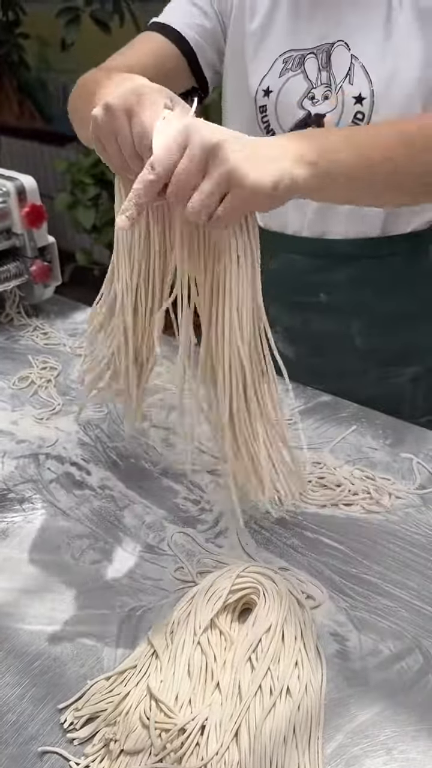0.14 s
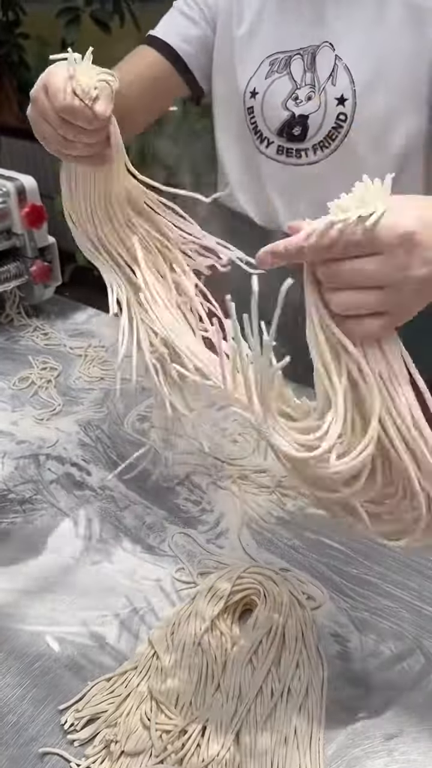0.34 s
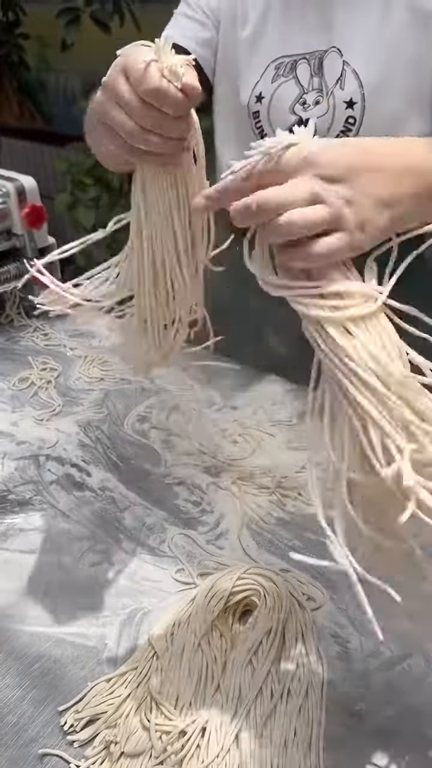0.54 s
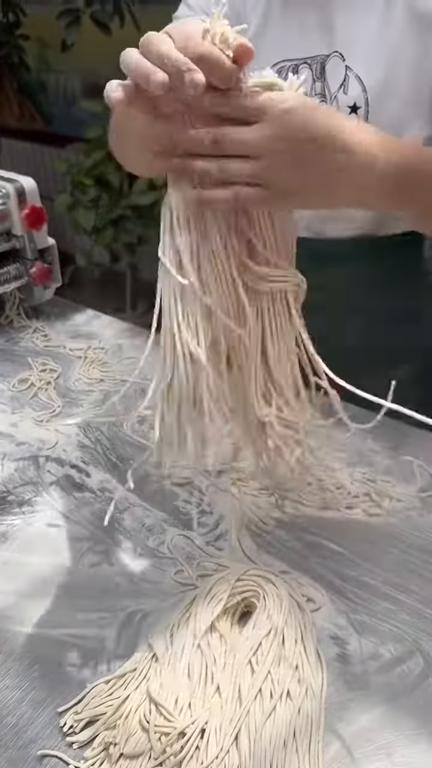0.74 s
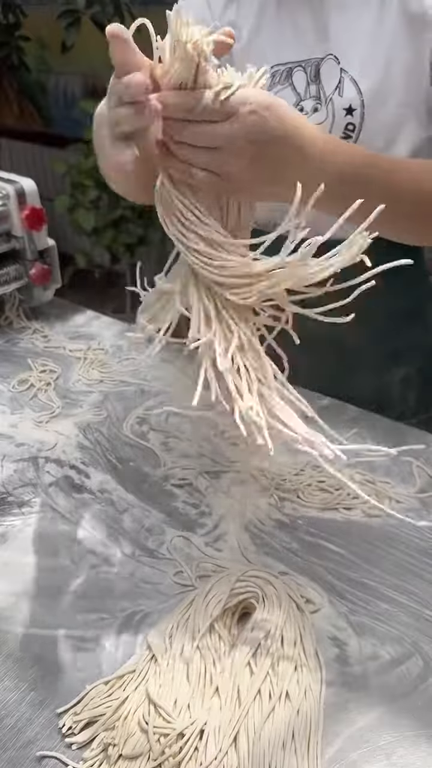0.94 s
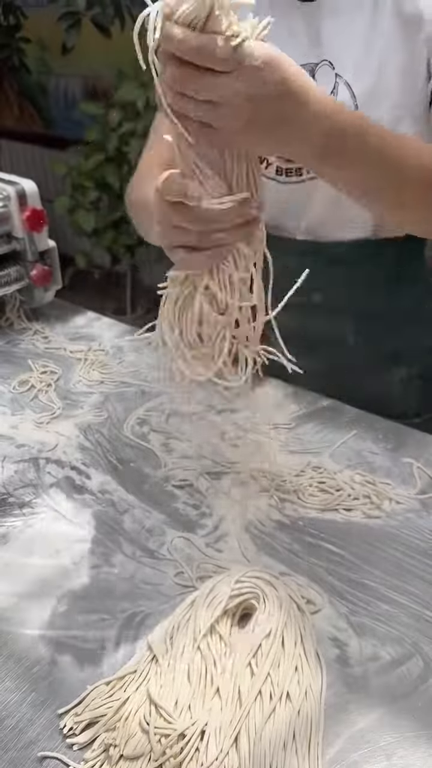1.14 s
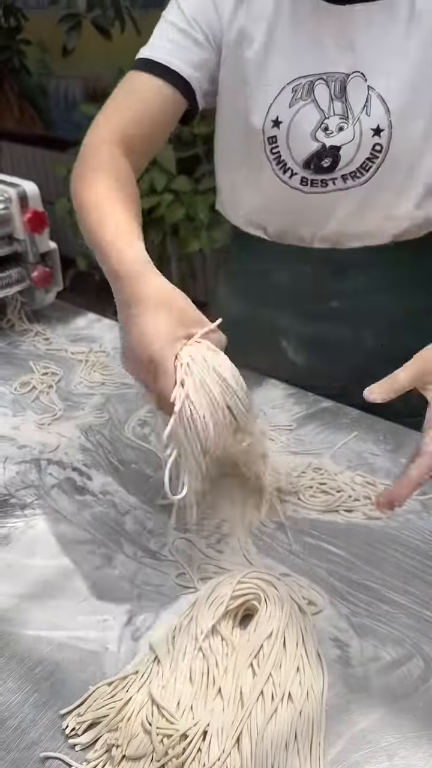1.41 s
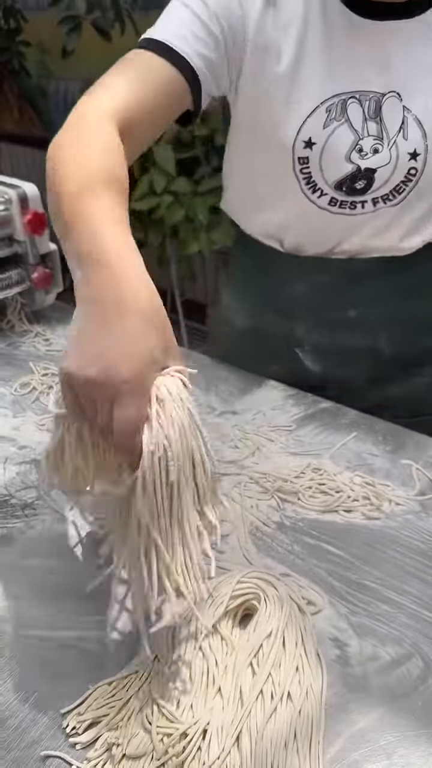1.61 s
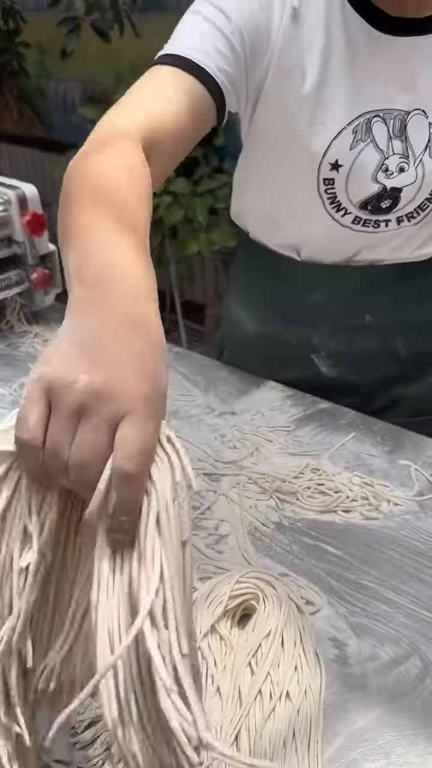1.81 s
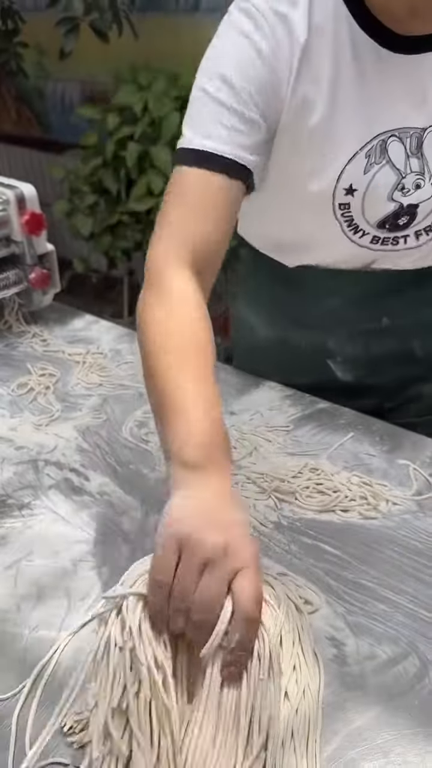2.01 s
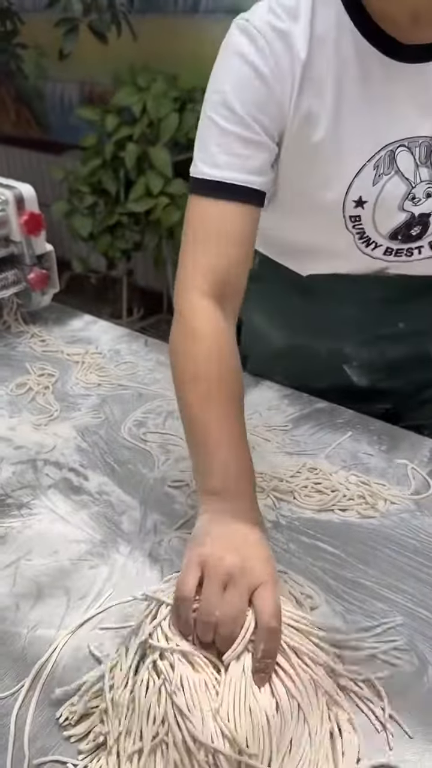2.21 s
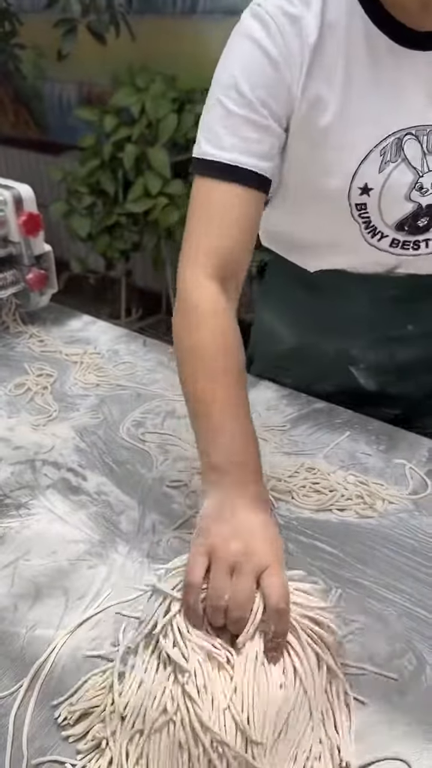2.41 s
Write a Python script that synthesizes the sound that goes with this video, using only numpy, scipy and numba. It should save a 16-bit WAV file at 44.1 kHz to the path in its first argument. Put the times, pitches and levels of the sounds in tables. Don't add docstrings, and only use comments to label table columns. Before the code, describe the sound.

A heavy slap of fresh noodles booms on a hollow metal worktop, then lighter pats follow

```python
import sys
import numpy as np
from scipy import signal
from scipy.fft import rfft, irfft
from scipy.io import wavfile
from numba import njit

SR = 44100
rng = np.random.default_rng(int(sys.argv[2]) if len(sys.argv) > 2 else 0)


def generate_wav(signal):
    frames = np.transpose(np.atleast_2d(signal))
    scaled = np.clip(frames, -1, 1) * 32767
    pcm = np.round(scaled).astype(np.int16)
    wavfile.write(sys.argv[1], SR, pcm)


def volts(x):
    e = np.asarray(x, float) / 20
    return 10 ** e


N = 114660
T = np.arange(N) / SR


def unit(x):
    return x / np.sqrt(np.mean(x ** 2))


@njit
def svf(x, hz, width):
    y, band_state, low_state = np.empty(len(x)), 0., 0.
    for i in range(len(x)):
        g, k = np.tan(np.pi * hz[i] / SR), width / hz[i]
        v = (band_state + g * (x[i] - low_state)) / (1 + g * (g + k))
        band_state = 2 * v - band_state
        low_state = low_state + 2 * g * v
        y[i] = k * v
    return y


def band(x, hz, width):
    return svf(x, hz + 0. * T, 1. * width) * np.sqrt(SR / (np.pi * width))


def twice(x, hz, width):
    return band(band(x, hz, width), hz, width) * np.sqrt(2 * np.pi * width / SR)


def high_pass(hz):
    return signal.butter(2, hz, "high", fs=SR, output="sos")


def dull(x):
    return signal.sosfilt(signal.cheby2(4, 22, DULL_HZ * 1.133, fs=SR, output="sos"), x)


def swell(at, rise, fade, hold=0):
    d = T - at
    rising = np.exp(-np.minimum((d / rise) ** 2, 99))
    fading = np.exp(-np.maximum(d - hold, 0) / fade)
    return np.where(d < 0, rising, fading)


def push(at, length):
    return np.cos(np.pi * np.clip((T - at) / length, -.5, .5)) ** 2


def grains(per_s, spread_db):
    hit, size, sign = rng.random((3, N))
    level = volts(np.minimum(-spread_db * np.log(size + 1e-9), 10))
    return unit((hit < per_s / SR) * level * np.sign(sign - .5))


DULL_HZ = 5300

# start in seconds, level in dB, length in seconds,
# direction.
AIR_PUSHES = [
    (.212, -11, .01, -1),
    (.2198, -3.7, .0115, 1),
    (.2293, -.5, .0058, -1),
    (.2495, -12, .003, -1),
    (.266, -14, .005, 1),
]
# pitch in Hz, level in dB, t60 in seconds.
BOOM_MODES = [(44.62, 0, 0.087), (87.74, -10, 0.056), (130, -7.5, 0.063), (191, -23, .05),
              (248.1, -23, .08), (314, -25.5, 0.061), (432.5, -16.5, .07)]


def slap_boom():
    force = sum(way * volts(db) * push(s + length / 2, length) for s, db, length, way in AIR_PUSHES)
    boom = 0
    for hz, db, t60 in BOOM_MODES:
        pole = np.exp(2j * np.pi * hz / SR - np.log(1000) / (t60 * SR))
        ring = signal.lfilter([1], [1, -pole], force).imag
        boom = boom + volts(db) * 2 * np.pi * hz / SR * ring
    return volts(1.77) * boom


# peak in seconds, level in dB, extra brightness in dB.
CRACK_ROWS = [
    (.2134, 0, 7),
    (.217, -5, 3),
    (.238, 0, -1),
    (.251, -6, -9),
    (.257, -7, -8),
]
# centre in Hz, width in Hz, level in dB.
CRACK_BANDS = [(550, 600, 4), (1200, 1200, -5), (2300, 1800, -12), (3800, 2200, -19), (6000, 2000, -30),
               (8300, 1500, -29)]


def slap_crack():
    noise = rng.standard_normal(N)
    bursts = [(db, up, swell(s, .0006, .0026)) for s, db, up in CRACK_ROWS]
    low = noise * sum(volts(db) * burst for db, up, burst in bursts)
    high = noise * sum(volts(db + up) * burst for db, up, burst in bursts)
    bands = [volts(db) * twice(high if hz > 900 else low, hz, width) for hz, width, db in CRACK_BANDS]
    return volts(-26.5) * sum(bands)


# centre in seconds, level in dB, length in seconds.
GUST_ROWS = [(0.045, -31.5, 0.011), (0.068, -31, 0.013), (0.088, -37.5, 0.013), (0.109, -39.5, 0.0086),
             (0.193, -21.5, 0.0075), (0.332, -47.5, 0.012), (0.393, -48, 0.0051), (0.415, -60, 0.0064),
             (1.266, -39.5, 0.012), (1.304, -38, 0.025), (1.347, -38, 0.0055), (1.368, -43.5, 0.0107),
             (1.395, -41, 0.0047), (2.082, -54.5, .008), (2.093, -54.5, 0.0081), (2.137, -43.5, 0.004)]


def gusts():
    air = -sum(volts(db) * push(s, length) for s, db, length in GUST_ROWS)
    return 2 * svf(air, 30 + 0. * T, 19.)


# pitch in Hz, width in Hz, level in dB.
RIM_RINGS = [(2646, 900, -2), (3280, 900, -14), (4630, 700, -14)]


def shoulder_and_rim(low, high, hollow):
    shoulder_level = volts(np.where(T < 1, -24, -8.5))
    shoulder = shoulder_level * twice(low, hollow * 1.32, 560)
    return shoulder + sum(volts(db) * twice(high, hz, width) for hz, width, db in RIM_RINGS)


HOLLOW_WIDTH_HZ = 270

# start in seconds, level in dB, fade in seconds,
# pitch of the hollow in Hz, brightness in dB.
PAT_ROWS = [(0.027, -37.5, 0.0045, 1060, -18), (.04, -45, 0.004, 964.1, -5.5),
            (1.337, -45, 0.0026, 956, -8), (1.34, -29, 0.0022, 950, -18.5),
            (1.367, -33.5, .0025, 935, -11.5), (1.373, -35, 0.0039, 942, -13),
            (1.381, -40, 0.0048, 942, -11), (1.397, -40.5, 0.002, 920, -12),
            (1.412, -44, 0.0022, 960, -9.5), (1.416, -39, .003, 960, -8), (1.426, -37.5, 0.0033, 990, -9.5),
            (1.433, -42, .002, 1000, -13), (1.438, -40.5, 0.0024, 1000, -11.5),
            (1.457, -47, 0.0027, 980, -5), (2.071, -30, 0.0023, 900, -13),
            (2.075, -28.5, 0.0017, 900, -14.5), (2.08, -38, 0.0018, 900, -10),
            (2.085, -28, 0.0023, 935, -21), (2.092, -17, 0.003, 913, -13), (2.1, -24.5, 0.0014, 948, -18),
            (2.11, -38.5, 0.004, 880, -14), (2.122, -44, 0.0023, 900, 2), (2.127, -42, 0.0035, 854, 4.5),
            (2.165, -50, 0.0038, 880, -2)]


def hollow_pitch():
    rows = np.array(PAT_ROWS)
    latest = np.searchsorted(rows[:, 0], T + .002) - 1
    return rows[np.clip(latest, 0, None), 3]


def pats(hollow):
    pops, low, high = 0, 0, 0
    for s, db, fade, hz, up in PAT_ROWS:
        rise = .55 * fade
        burst = swell(s + rise, rise, fade)
        pops = pops + volts(db + 4.5) * burst * np.sin(2 * np.pi * (hz * T + rng.random()))
        low = low + volts(db) * burst
        high = high + volts(db + up) * burst
    low_puff = low * np.sign(rng.standard_normal(N))
    high_puff = high * np.sign(rng.standard_normal(N))
    body = svf(pops, hollow, 2. * HOLLOW_WIDTH_HZ)
    return dull(body + shoulder_and_rim(low_puff, high_puff, hollow))


# start in seconds, hold in seconds, fade in seconds,
# level in dB, brightness in dB.
PATTER_ROWS = [
    (0.026, 0.026, 0.095, -51.5, -4.5),
    (1.331, .11, 0.028, -45, -6.5),
    (1.924, 0.083, 0.044, -64, -3),
    (2.066, 0.035, 0.035, -48, 1),
]


def patter(hollow):
    beds = [(db, up, swell(s + 0.0071, 0.0027, fade, hold)) for s, hold, fade, db, up in PATTER_ROWS]
    low = sum(volts(db) * bed for db, up, bed in beds) * grains(2500, 3.5)
    high = sum(volts(db + up) * bed for db, up, bed in beds) * grains(2500, 3.5)
    body = twice(low, hollow, HOLLOW_WIDTH_HZ * 1.6)
    return dull(body + shoulder_and_rim(low, high, hollow))


# peak in seconds, pitch in Hz, half length in seconds, peak in dB.
SNAP_ROWS = [
    (2.1995, 3750, .001, -34),
    (2.1995, 2950, .0005, -33),
    (2.1995, 4300, .0005, -36),
    (2.1995, 5700, .0004, -41),
    (2.198, 2400, .0009, -41),
    (2.2017, 2300, .001, -41),
    (2.1995, 900, .002, -44),
]


def snap():
    ring = 0
    for s, hz, half, db in SNAP_ROWS:
        d = T - s
        ring = ring + volts(db) * np.exp(-(d / half) ** 2) * np.cos(2 * np.pi * hz * d)
    return ring


def rubbing(table, width):
    soft, bright = np.zeros(N), np.zeros(N)
    for s, rise, fade, db, hz in table:
        colour = twice(grains(5000, 2), hz, hz * width)
        part = volts(db) * swell(s, rise, fade) * colour
        if hz < DULL_HZ:
            soft += part
        else:
            bright += part
    return dull(soft) + bright


# peak, rise and fade in seconds, level in dB, centre in Hz.
RUSTLE_ROWS = [(0.083, 0.028, 0.0566, -62.5, 4000), (.18, 0.0079, 0.017, -39.5, 3600),
               (.18, 0.0043, 0.012, -39, 2310), (2.097, 0.0057, 0.01, -41, 3900),
               (2.075, 0.0037, 0.023, -53, 4100), (.18, 0.0115, 0.0072, -44.5, 830),
               (0.23, 0.0075, 0.0058, -47.5, 2000), (.408, 0.012, 0.012, -62, 4000),
               (.485, 0.019, 0.057, -55.5, 2920), (0.49, 0.017, 0.049, -63, 900),
               (0.4905, 0.018, 0.063, -63.5, 4900), (1.5, 0.013, .03, -70.5, 1800),
               (2.17, 0.044, 0.13, -55, 2380), (1.482, 0.058, 0.095, -62.5, 2600),
               (1.517, 0.037, 0.083, -61.5, 890), (2.205, 0.0079, 0.053, -56, 4300),
               (2.125, .012, .03, -53, 4000)]


def rustles():
    return rubbing(RUSTLE_ROWS, .8)


# peak, rise and fade in seconds, level in dB, centre in Hz.
DRAG_ROWS = [(.031, 0.0062, 0.0257, -49.5, 2540), (.08, 0.0238, 0.04, -61.5, 3350),
             (1.341, 0.0034, 0.0035, -40.5, 2500), (0.49, 0.017, 0.051, -59, 2410),
             (0.482, 0.0087, .03, -61.5, 3300), (0.27, 0.0024, .005, -48, 6400),
             (0.19, 0.0058, .004, -49, 5500), (1.372, 0.0042, .008, -46.5, 2200),
             (2.097, 0.0068, 0.0067, -36, 3200), (2.097, .004, 0.016, -49.5, 3800),
             (0.016, .007, 0.011, -55, 1020), (2.168, 0.006, 0.0081, -48, 2600)]


def drags():
    return rubbing(DRAG_ROWS, .2)


# peak, rise and fade in seconds, level in dB, centre in Hz.
FIZZ_ROWS = [
    (.08, .02, .1, -62, 6100),
    (.178, .01, .014, -51, 6200),
    (.18, .008, .012, -59, 8300),
    (.245, .015, .012, -55, 6000),
    (.245, .015, .01, -60, 8000),
    (.41, .012, .012, -66, 5200),
]


def fizz():
    return rubbing(FIZZ_ROWS, .35)


# peak, rise and fade in seconds, level in dB, centre in Hz.
RUMBLE_ROWS = [(.07, 0.041, 0.064, -50, 147.6), (.19, 0.017, 0.031, -43, 289),
               (.225, 0.013, 0.024, -21, 342), (.24, 0.0047, 0.015, -29.5, 692),
               (.33, .02, 0.07, -50.5, 90.1), (.48, 0.017, 0.023, -64, 60.3),
               (.93, 0.023, 0.024, -70.5, 123.3), (1.3, 0.031, 0.058, -63.5, 153.3),
               (1.36, 0.03, 0.11, -57, 314), (1.45, 0.034, 0.033, -60, 59.6), (2.0, 0.076, 0.049, -68, 130),
               (2.09, 0.021, 0.038, -46.5, 383), (2.1, 0.043, 0.039, -57, 130),
               (2.2, 0.021, 0.032, -57, 112), (.06, .03, .07, -56, 430), (.34, .03, .05, -58, 240),
               (1.34, .004, .008, -46, 520), (2.08, .015, .02, -55.5, 70), (2.22, .03, .04, -60, 280),
               (.235, .012, .015, -38.5, 1300)]


def rumbles():
    return rubbing(RUMBLE_ROWS, .8)


# multiple of 50 Hz, level in dB rms.
HUM_LINES = [(1, -81.5), (2, -80.5), (3, -81.5), (4, -92.5), (5, -75), (6, -80.5), (7, -96.5), (9, -84),
             (12, -86), (14, -84), (16, -87), (20, -83), (25, -86.5), (30, -88)]


def mains():
    multiples = np.arange(8, 70)
    scatter = 3 * rng.standard_normal(len(multiples))
    buzz = -90.5 - 3 * np.log2(multiples / 10) + scatter
    knots = np.arange(0, T[-1] + .12, .12)
    hum = 0
    for k, db in list(HUM_LINES) + list(zip(multiples, buzz)):
        waver_db = 2 * np.interp(T, knots, rng.standard_normal(len(knots)))
        tone = np.sin(2 * np.pi * (k * 50 * T + rng.random()))
        hum = hum + np.sqrt(2) * volts(db + waver_db) * tone
    return hum


# frequency in Hz, density in dB per Hz.
HISS_COLOUR = [(30, 4), (120, -1.5), (300, 1), (1000, -4), (2500, -6), (4500, -11.5), (6000, -20.5),
               (7500, -36)]


def room_hiss():
    hz, shape = np.fft.rfftfreq(N, 1 / SR), np.array(HISS_COLOUR)
    colour = volts(np.interp(np.log(hz + 1), np.log(shape[:, 0]), shape[:, 1])) * (hz > 38)
    return volts(-70) * unit(irfft(rfft(rng.standard_normal(N)) * colour, N))


# time in seconds, gain in dB.
FLOOR_SWELL = [(0, 4.5), (.6, -3), (1.3, -4), (1.7, -1.5), (2.1, 3.5), (2.6, 3)]


def floor():
    both = mains() + room_hiss()
    upper = signal.sosfiltfilt(high_pass(200), both)
    return both + upper * (volts(np.interp(T, *np.array(FLOOR_SWELL).T)) - 1)


def room(sent):
    t = T[:SR // 2]
    tails = rng.standard_normal((2, len(t))) * np.exp(-np.log(1000) * t / .3) * (t > .004)
    tails = signal.sosfilt(signal.butter(2, 4000, fs=SR, output="sos"), tails)
    tails = tails / np.sqrt(np.sum(tails[0] ** 2))
    return volts(-18) * signal.fftconvolve(sent[None], tails, axes=1)[:, :N]


def scene():
    hollow = hollow_pitch()
    crack = slap_crack()
    near = pats(hollow) + patter(hollow) + snap() + rustles() + drags() + fizz()
    lows = slap_boom() + gusts() + rumbles()
    background = floor()
    wet = room(near + volts(-11) * crack)
    side = volts(-22) * (wet[1] + np.roll(crack + near, SR // 4000))
    side = side + volts(-23.5) * np.roll(background, N // 3)
    side = signal.sosfilt(high_pass(3000), side)
    side = side + volts(-38) * np.roll(lows + near, SR // 300)
    return near + crack + lows + wet[0] + background + side * np.array([[1], [-1]])


def band_limit(x):
    return signal.sosfilt(signal.butter(12, 9550, fs=SR, output="sos"), x)


def record(dry):
    x = signal.sosfilt(signal.cheby2(10, 50, 9300 * 0.99, fs=SR, output="sos"), dry)
    return band_limit(np.clip(x + .0015, -1, 1))


dry = scene()
out = record(dry)
generate_wav(out)
```